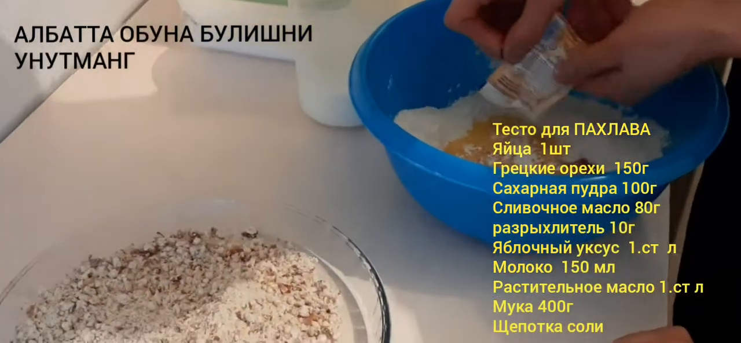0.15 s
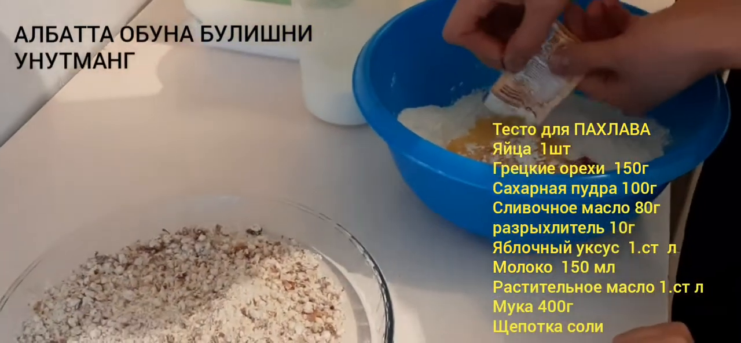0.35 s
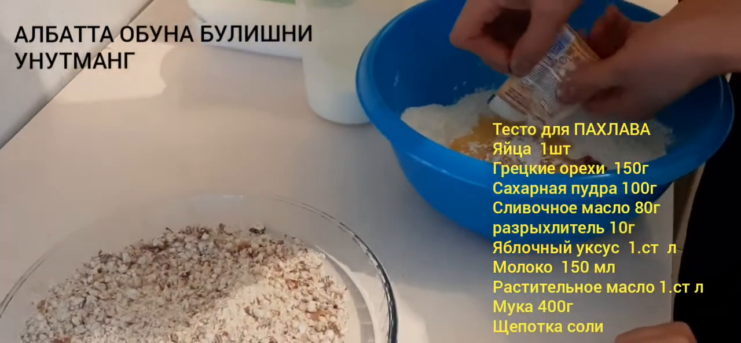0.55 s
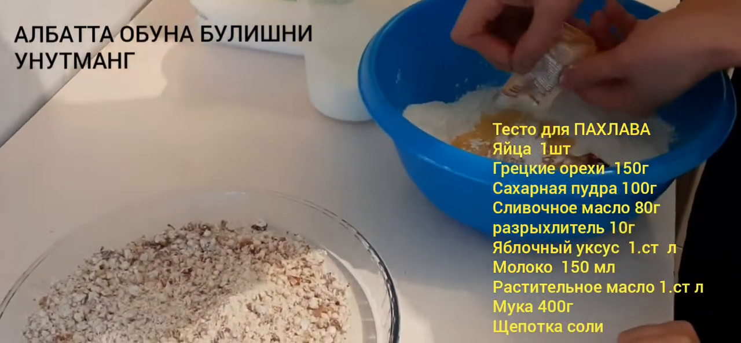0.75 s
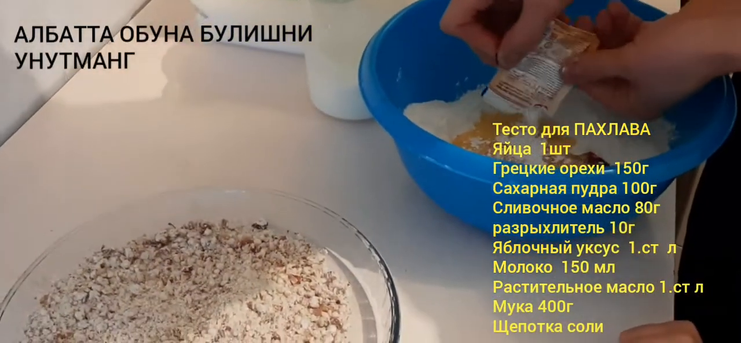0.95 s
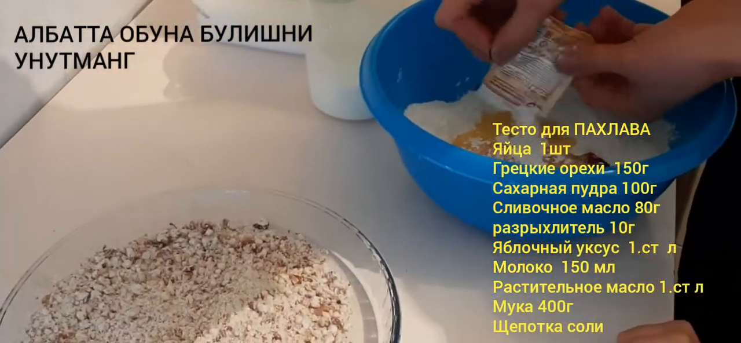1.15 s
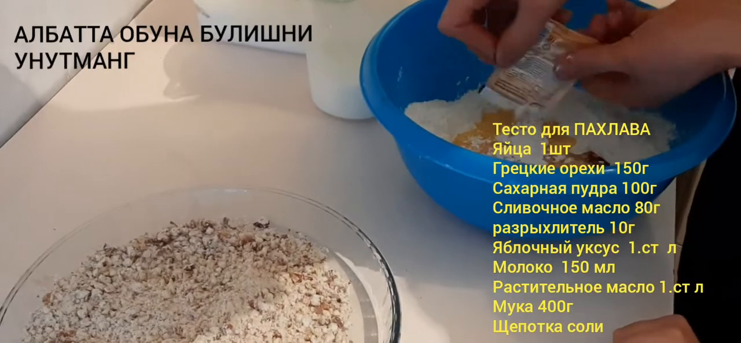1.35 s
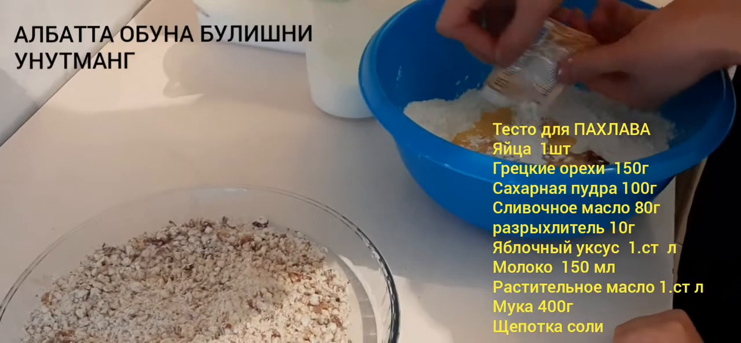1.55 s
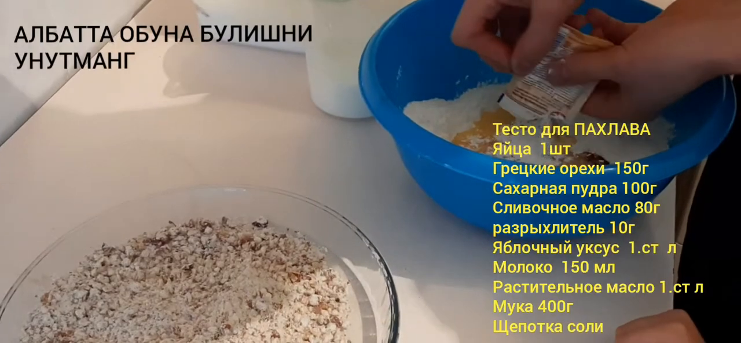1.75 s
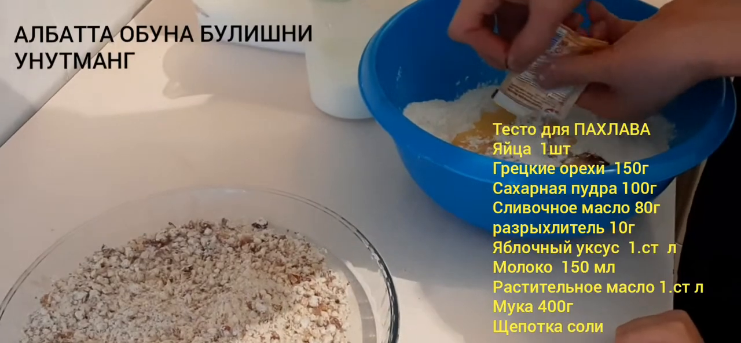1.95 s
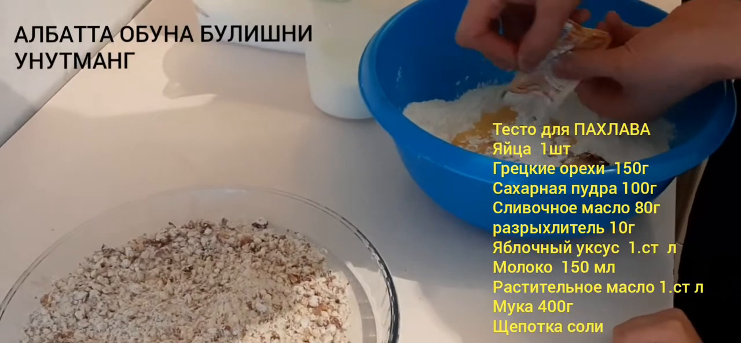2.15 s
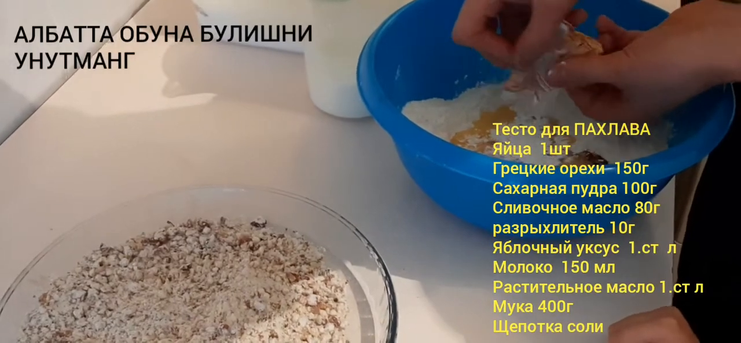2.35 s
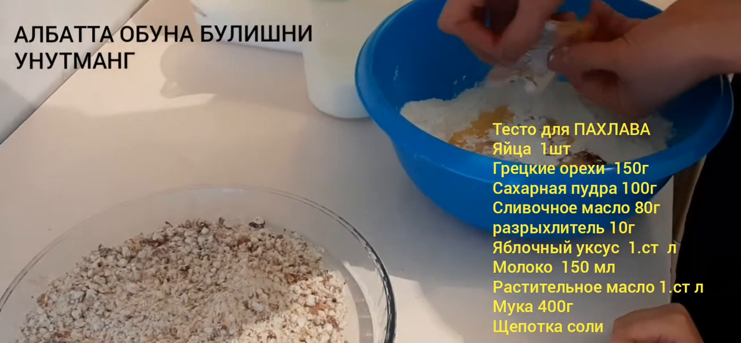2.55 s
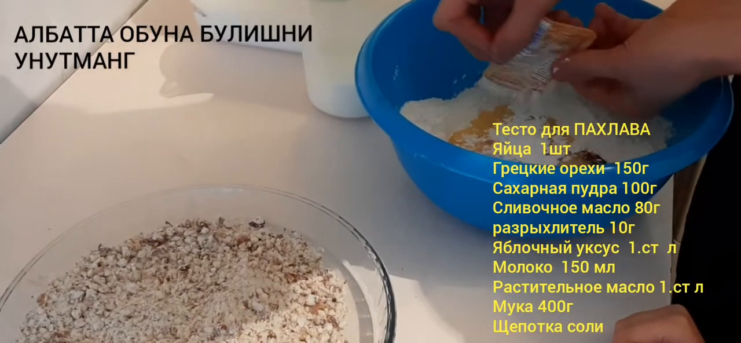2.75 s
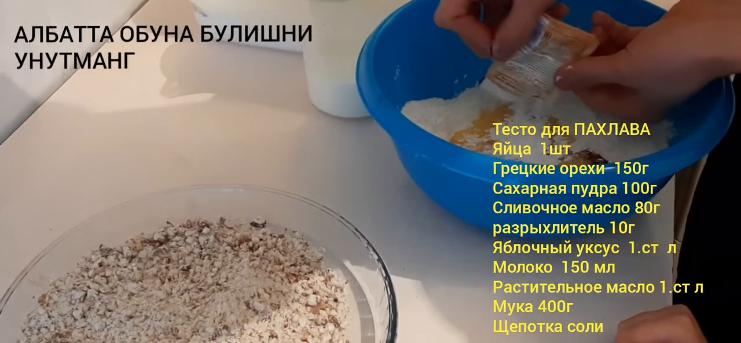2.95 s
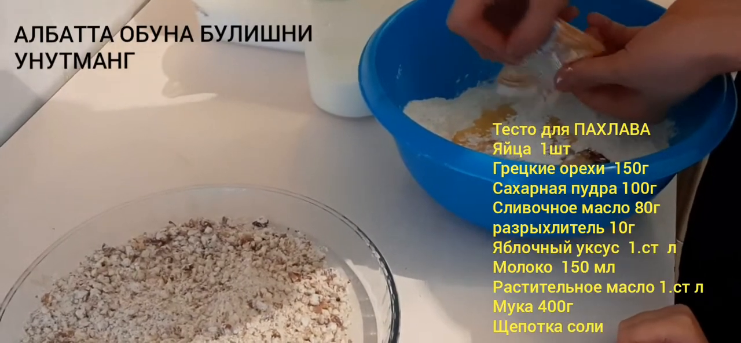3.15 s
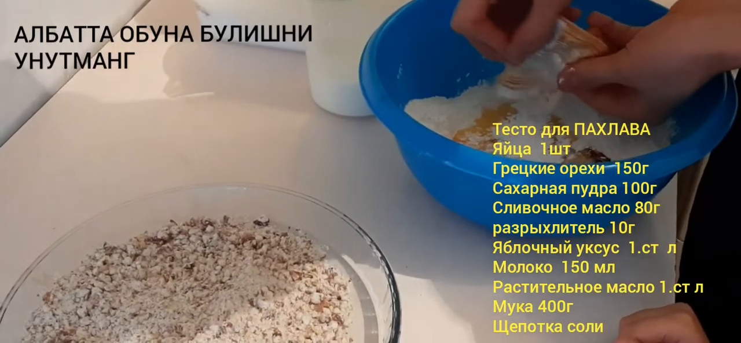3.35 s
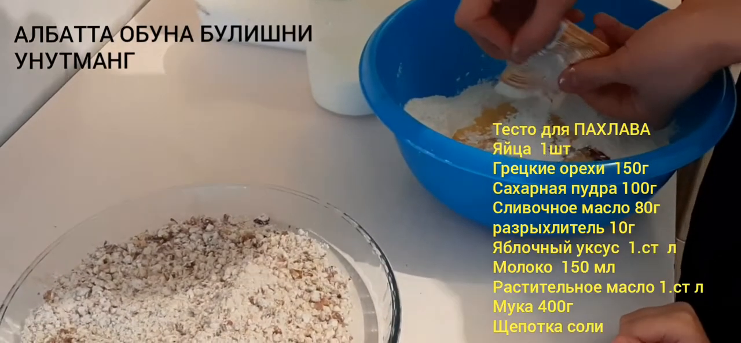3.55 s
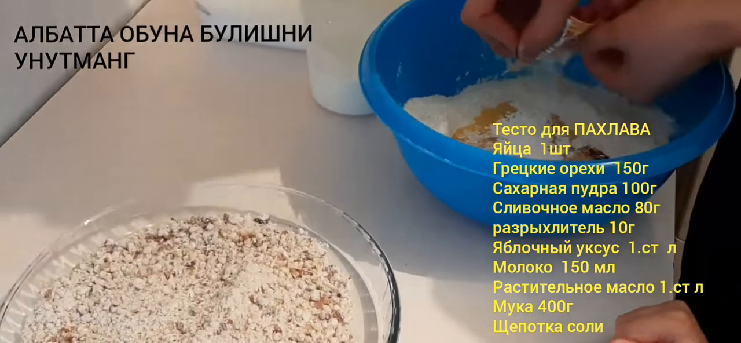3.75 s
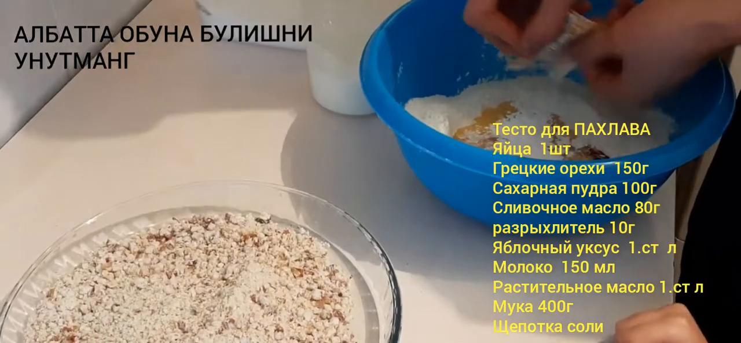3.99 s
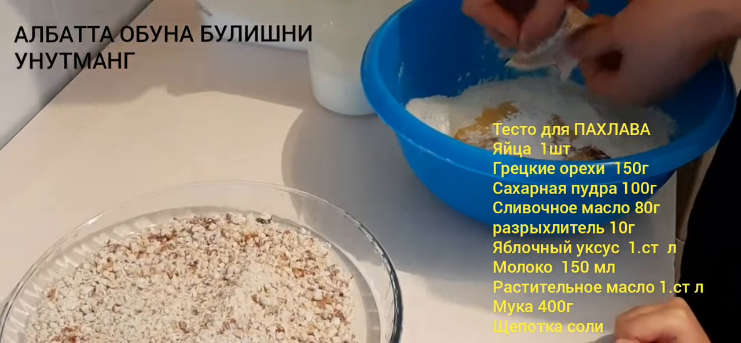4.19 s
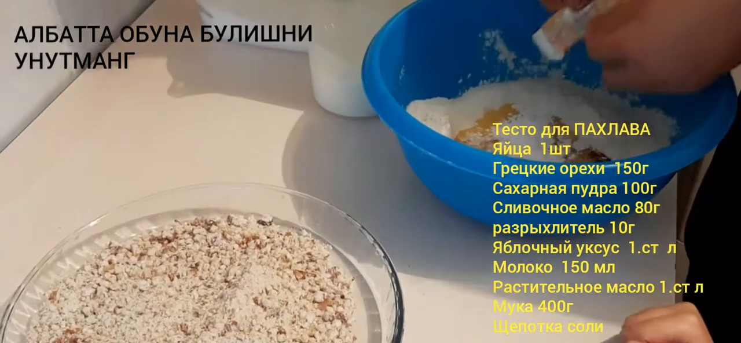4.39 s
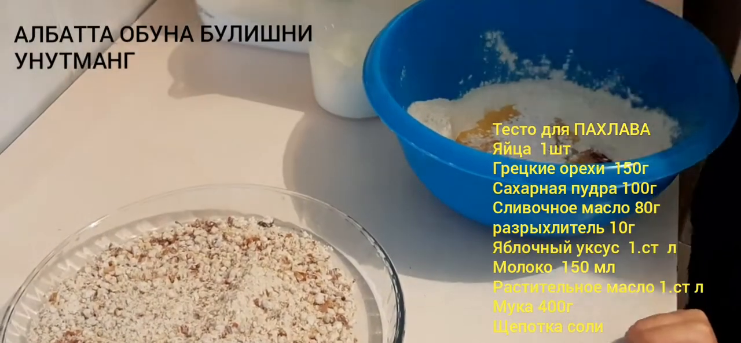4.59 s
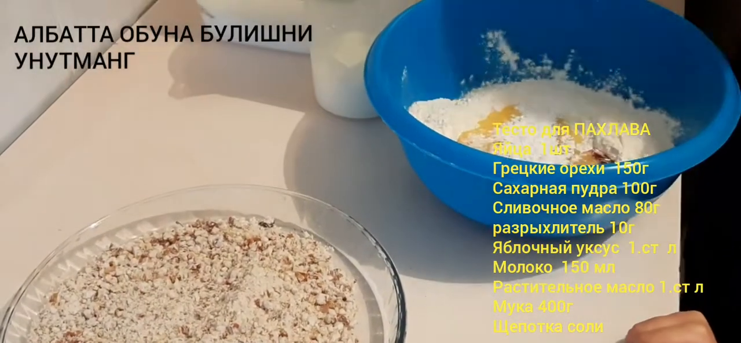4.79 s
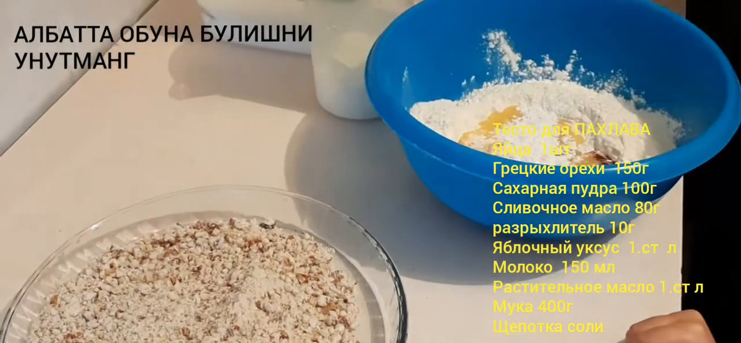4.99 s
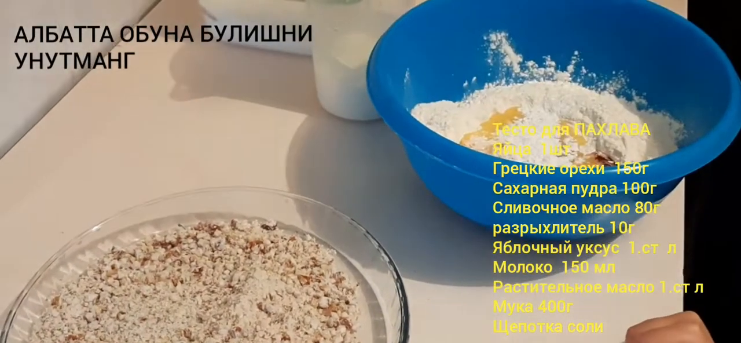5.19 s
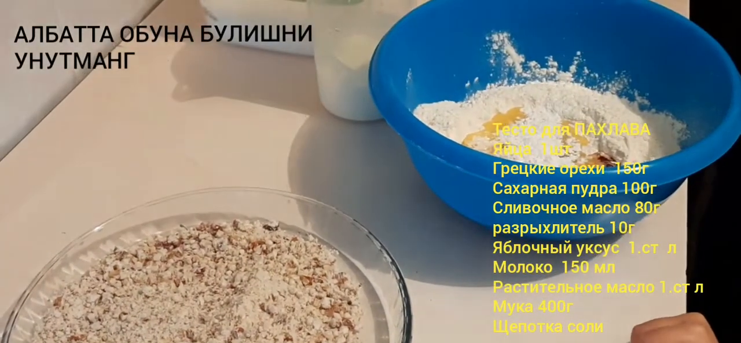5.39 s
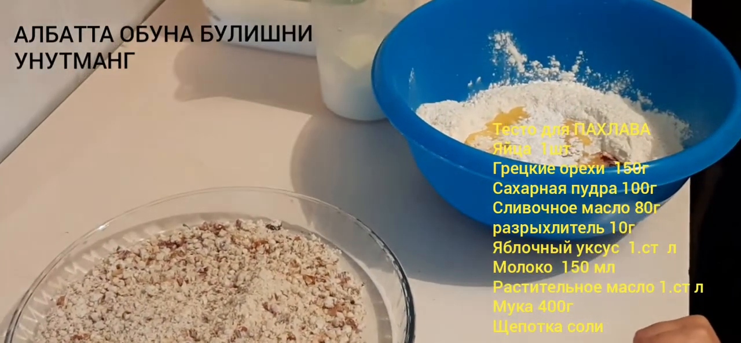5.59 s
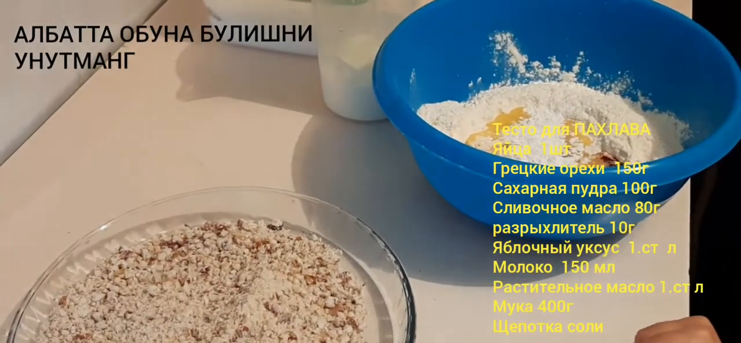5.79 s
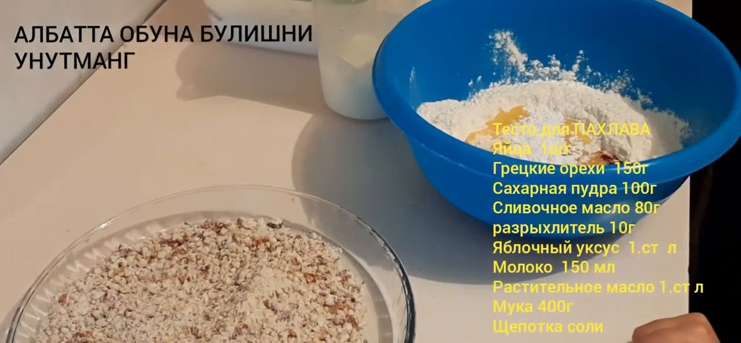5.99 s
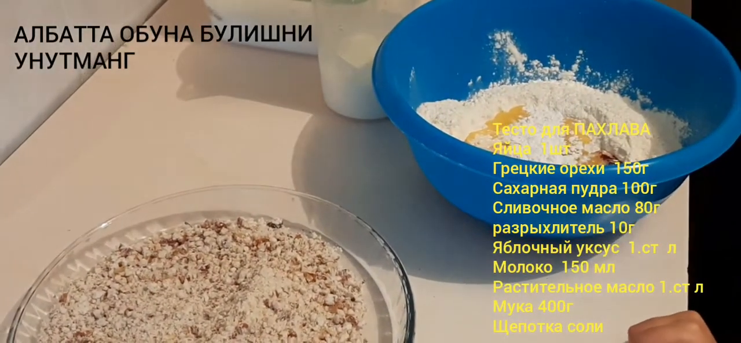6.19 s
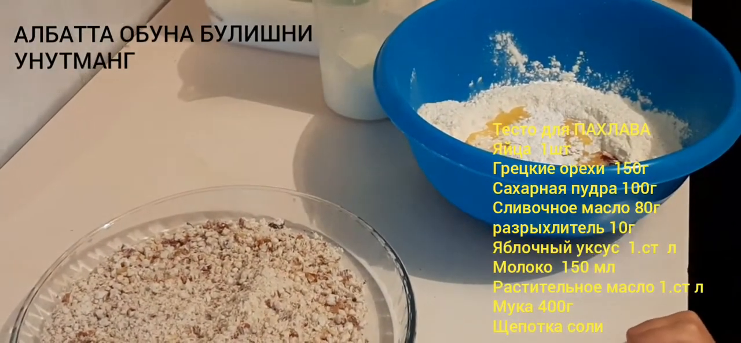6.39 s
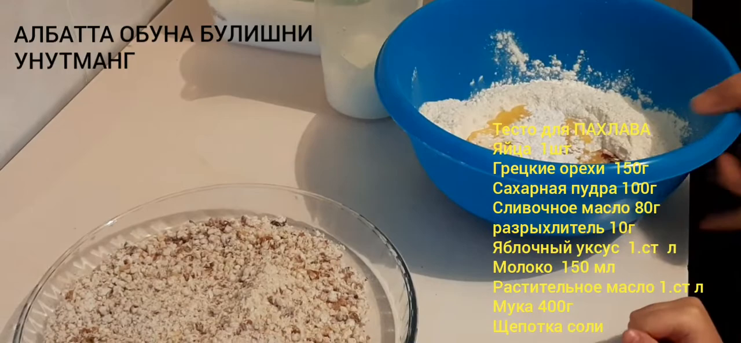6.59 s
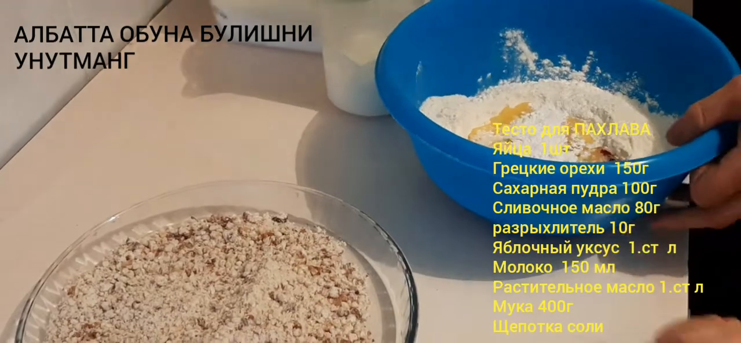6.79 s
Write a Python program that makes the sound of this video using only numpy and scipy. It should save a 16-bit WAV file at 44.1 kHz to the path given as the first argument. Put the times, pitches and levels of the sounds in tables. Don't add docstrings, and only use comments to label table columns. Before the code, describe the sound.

Very close stereo sound of a small paper sachet in a hard kitchen. Light separate snaps and rustles at first, then denser, louder crumpling with hollow pops, strongest in the middle. The crackle thins and moves left as the packet is put aside. A hard knock follows, then a brief scrape along the counter ending in two bumps. Faint hiss and distant low rumble lie underneath.

```python
import sys
import numpy as np
from scipy import signal
from scipy.fft import rfft, irfft
from scipy.io import wavfile
from scipy.ndimage import uniform_filter1d

SR = 44100
rng = np.random.default_rng(int(sys.argv[2]) if len(sys.argv) > 2 else 0)


def elevation(decibels):
    levels = np.asarray(decibels, float)
    return 10 ** (levels / 20)


def int16_out(signal):
    q = np.round(np.clip(np.atleast_2d(signal).T, -1, 1) * 32767)
    wavfile.write(sys.argv[1], SR, q.astype(np.int16))


N = 301515

# pitch_hz, level_db, t60_s
CUPBOARD_MODES = [(104, -0.5, 0.1), (187.3, 2, 0.14), (257, 0.5, 0.066)]


def in_time(rows):
    s, *columns = np.transpose(rows)
    return [np.interp(np.arange(N) / SR, s, c) for c in columns]


def at_hz(points, hz):
    point_hz, value = np.transpose(points)
    return np.interp(np.log(hz + 1), np.log(point_hz), value)


def rms_one(x):
    return x / np.sqrt(np.mean(x ** 2) + 1e-20)


def drift(rate):
    r = np.exp(-2 * np.pi * rate / SR)
    wander = signal.lfilter([1], [1, -2 * r, r * r], rng.standard_normal(N + SR))
    return rms_one(wander[SR:])


def resonance(x, hz, width_hz):
    r = np.exp(-np.pi * width_hz / SR)
    top = np.array([1, 0, -1]) * (1 - r * r) / 2
    return signal.lfilter(top, [1, -2 * r * np.cos(2 * np.pi * hz / SR), r * r], x + 1e-18)


def body(x, peaks):
    return sum((-1) ** k * elevation(db) * resonance(x, hz, width) for k, (hz, width, db) in enumerate(peaks))


def colour(x, spectrum):
    hz = np.minimum(np.arange(1025) * SR / 2048, 15000)
    cepstrum = irfft(np.log(elevation(at_hz(spectrum, hz))))
    cepstrum = cepstrum * np.r_[1, np.full(1023, 2), 1, np.zeros(1023)]
    return signal.oaconvolve(x, irfft(np.exp(rfft(cepstrum)))[None], axes=1)[:, :N]


def tint(hz, dull_db, bright_db):
    octaves = np.log2(hz / 3500)
    if hz <= 300:
        dull_db = np.minimum(dull_db, -3)
    dull = dull_db * np.clip(-octaves - .8, 0, 1)
    bright = bright_db * np.clip(2 * octaves - 1.6, 0, 1)
    return elevation(dull + bright)


def volleys(s, peak_db, slow):
    build_s = np.where(slow, .018, .004) * elevation(rng.standard_normal(len(s)))
    lead = rng.random((len(s), 12)) ** 1.5 * (np.arange(12) > 0)
    at = ((s[:, None] - .0008 - lead * build_s[:, None]) * SR).astype(int)
    volley = elevation(-10.0 * lead + 0.53 * rng.standard_normal(lead.shape))
    whole = elevation(peak_db + np.where(slow, 2, 6)) / np.linalg.norm(volley, axis=1)
    return np.clip(at, 0, N - 1), volley * whole[:, None], whole


def crackle(s, peak_db, slow):
    # under_peak_db, swell_db_per_s, dying_db_per_s, rounded_top_s
    snap_rustle = (-13.5, 5000, 800, .004)
    squeeze_rustle = (-5, 560, 600, 0.011)
    born = np.flatnonzero(rng.random(N) < 6000 * elevation(3 * drift(60)) / SR)
    shape = np.where(slow, np.array(squeeze_rustle)[:, None], np.array(snap_rustle)[:, None])
    under_db, swell, dying, top_s = shape[:, :, None]
    since = born / SR - s[:, None]
    slope = np.where(since < 0, swell, dying)
    around = elevation(peak_db[:, None] + under_db + slope * (top_s - np.hypot(since, top_s))) ** 2
    height_db = -4.5 + 1.5 * drift(60) + 2.6 * np.minimum(rng.exponential(1, N), 4)
    return born, elevation(height_db)[born], around


def cracks():
    # start_s, peak_db, pitch_hz
    stiff = [(0.443, -31, 5230), (.507, -26, 3050), (.556, -30.5, 980), (0.699, -44, 6000),
             (.832, -37, 9100), (.939, -33, 5000), (1.12, -31, 6000), (1.129, -31, 5600),
             (1.236, -35.5, 4040), (1.317, -37, 5000), (1.361, -49, 6000), (1.396, -31.5, 3180),
             (1.509, -22, 1094), (1.579, -31.5, 2480), (1.677, -26, 7700), (1.704, -33.5, 2500),
             (1.751, -29.5, 2300), (1.951, -26, 2870), (1.961, -17.5, 1090), (1.979, -30, 3000),
             (2.016, -29.5, 2180), (2.115, -20, 3240), (2.132, -43, 4160), (2.327, -31, 2820),
             (2.333, -20, 3160), (2.347, -18, 3130), (2.441, -25, 1400), (2.521, -20, 1370),
             (2.527, -23.5, 7350), (2.568, -25.5, 4160), (2.601, -19, 3070), (2.612, -30, 2480),
             (2.622, -22, 3470), (2.782, -40, 2220), (2.866, -21, 4470), (3.016, -38, 2130),
             (3.033, -20, 4450), (3.042, -18, 4440), (3.128, -24.5, 1280), (3.134, -21, 900),
             (3.201, -24, 3900), (3.271, -23, 2130), (3.339, -28, 2180), (3.454, -18, 6200),
             (3.55, -30.5, 1260), (3.733, -29, 3000), (3.741, -22.5, 5000), (4.496, -28.5, 2020),
             (4.257, -52, 2980), (5.058, -38, 7800), (5.341, -47, 5000), (5.352, -46, 5060),
             (6.665, -37, 2020), (5.116, -40.5, 11000)]
    # start_s, peak_db, pitch_hz
    pops = [(0.555, -44, 993), (1.506, -45, 999), (1.961, -21, 999), (2.013, -42, 633), (2.115, -51, 999),
            (2.293, -52, 665), (2.329, -48, 999), (2.359, -30, 589), (2.433, -39, 622), (2.597, -44, 974),
            (2.783, -38, 463), (2.818, -39, 974), (2.854, -25.5, 891), (2.949, -42, 977), (2.968, -35, 991),
            (3.014, -31, 947), (3.116, -37, 608), (3.266, -25, 606), (3.298, -35, 643), (3.39, -26, 606),
            (3.433, -41, 1000), (3.702, -46, 633), (3.737, -40, 549), (3.879, -32, 557), (3.994, -24, 484),
            (4.079, -23, 573)]
    # start_s, peak_db, pitch_hz
    further_cracks = [(.684, -35, 9000), (1.4305, -33, 9200), (1.909, -29, 2130), (1.930, -36.5, 10000),
                      (2.109, -31.5, 4200), (2.1541, -27, 3700), (2.588, -30, 3500), (2.608, -19.5, 3480),
                      (2.7144, -23.5, 3700), (2.7294, -28, 3700), (2.7564, -30, 3680), (2.8802, -21, 4610),
                      (3.471, -23.5, 3570), (3.675, -34, 1570), (3.76, -28, 2300), (3.7805, -30, 1930),
                      (3.899, -27, 4000), (3.915, -24, 3600), (3.925, -33, 2500), (4.034, -28.5, 2120),
                      (4.0746, -29, 3820), (4.088, -25.5, 3840), (4.1194, -32, 3500), (4.30, -44, 2980),
                      (4.34, -56, 3000)]
    return np.transpose(stiff + pops + further_cracks)


def paper():
    # start_s, peak_db, dull_db, bright_db
    shaking = [(.1515, -33.5, -10, -24), (.1814, -29, -17, -25), (.1946, -34.5, -3, 6.5),
               (.232, -34, -9, -3), (.3615, -27.5, -38, -11), (.4243, -29.5, -34, -14),
               (.4433, -24, -55, -13), (.5081, -38, -19, -55), (.5561, -38, 16, 13.5), (.6468, -32, -6, -1),
               (.6865, -44.5, -11, 23), (.833, -36, -29, 7), (.856, -22.5, -18.5, -29),
               (.8974, -30, -49, -3), (.9399, -39.5, -23, 10), (.962, -28.5, -6, 1), (1.0496, -27, -44, -9),
               (1.13, -27, -7.5, -5), (1.2183, -44, -9, 13), (1.2353, -23.5, -40, -38),
               (1.3175, -26, -36, -18), (1.3617, -29.5, -19, -10), (1.3953, -31, -27, -43),
               (1.5008, -31, -4, -1), (1.5095, -21.5, -1.5, -8), (1.644, -20.5, -22, -9),
               (1.7509, -31.5, -28, 4), (1.7869, -26.5, -19, -3), (1.8793, -27, -5.5, -36),
               (1.9391, -36, -12, 15.5)]
    # start_s, peak_db, dull_db, bright_db
    crumpling = [(2.1166, -16.5, -11.5, -13), (2.1312, -23.5, -48, -24), (2.219, -30, -24, -22),
                 (2.2913, -32, -3, -2.5), (2.3341, -20.5, -4.5, -45), (2.3486, -22.5, -40, -0.5),
                 (2.4087, -19.5, -15, -10.5), (2.4351, -18, -3.5, -13), (2.453, -30, 3, 9.5),
                 (2.5146, -14, -15, -10), (2.5694, -25.5, -24, 4.5), (2.6027, -18.5, -3, -14),
                 (2.703, -21, -26, -8), (2.7602, -24, -26, -4), (2.827, -18, -2.5, -5.5),
                 (2.8811, -40, -22, -8), (2.9524, -22, 0, -1), (2.9673, -15.5, -0.5, -3.5),
                 (3.125, -18, -0.5, 3.5), (3.1833, -25, 2, -22), (3.2641, -27, -12, 8),
                 (3.3226, -21.5, -1.5, -24), (3.3793, -27, -15, 2), (3.3918, -21.5, -4, -5.5),
                 (3.44, -18.5, -3.5, -10), (3.4562, -21, -49, -9), (3.47, -19, -59, -8),
                 (3.5503, -52, 3, -26)]
    # start_s, peak_db, dull_db, bright_db
    folding = [(3.6762, -34, -9, -3), (3.7006, -24.5, -4, -6), (3.7149, -19.5, -8, -3.5),
               (3.7812, -25, 5, 1), (3.8251, -26, -11, -11), (3.8766, -34.5, 14, 4),
               (3.916, -25, -32, -3.5), (3.9983, -21, 0, -1), (4.0344, -33, -1, -10),
               (4.2585, -34.5, -7.5, -54), (4.4215, -39, -14, -4), (4.435, -24.5, -32, -18),
               (4.4577, -27.5, -8.5, -10), (4.4945, -21, -20, -3), (4.62, -38.5, -8, -25),
               (4.655, -39, -2, -19), (4.979, -43, -13, -23), (5.337, -48, -34, -5),
               (6.2626, -36.5, 13.5, -8), (6.6634, -60, 0, -28), (6.797, -31, -14.5, -7.5)]
    # start_s, peak_db, dull_db, bright_db
    squeezes = [(0.01, -38, -3, 8.5), (0.692, -37.5, -14, 9), (0.764, -41, -9, -29),
                (0.8827, -43.5, -34, 5), (1.065, -56, -19, -14), (1.199, -42.5, -3.5, -4),
                (1.4305, -38.5, -8.5, -1), (1.6537, -38, -13, 8.5), (1.703, -40.5, -4, -21),
                (1.8032, -39.5, -31, -6), (1.9637, -32, 3.5, -17), (2.017, -37.5, 6, 5.5),
                (2.1567, -39.5, -5, -30), (2.523, -30, -18, -12), (2.608, -25, -13, 1.5),
                (2.669, -31, -35, -2), (2.7196, -32, -25, -4), (2.784, -27, -3.5, 4.5),
                (2.866, -28.5, -3, 5), (3.0166, -27, 3, -0.5), (3.044, -26.5, -45, 3),
                (3.1309, -46, 6, -19), (3.201, -30.5, -35, 7), (3.272, -38, 5.5, -16),
                (3.337, -30, -26, 2.5), (3.744, -23.5, -2, 2.5), (3.912, -28, -1, -1.5),
                (4.0903, -32, -14, 6), (5.06, -61, -6, 17), (5.139, -36, 0.5, 0.5)]
    # time_s, rustle_db, dull_db
    handling = [(0, -44, -12), (.12, -63, -5), (.2, -49, -8), (.34, -66, 2), (.4, -52.5, -32),
                (.66, -55.5, 8), (.82, -78, -12), (.9, -58, -3.5), (1.4, -50.5, -9), (2.0, -56.5, 2.5),
                (2.3, -52, -10), (2.55, -49, 5.5), (2.85, -44.5, -4), (3.45, -51, 5), (3.62, -59.5, -4),
                (4.13, -42, -2.5), (4.2, -59.5, 1), (4.4, -59.5, 4.5), (4.55, -56, -5)]
    # time_s, rustle_db, dull_db
    carrying = [
        (4.93, -70, -6),
        (5.0, -52, 2.5),
        (5.3, -58, -9),
        (5.52, -62.5, 3),
        (5.7, -50.5, -4),
        (6.3, -61, 15.5),
        (6.44, -64.5, -12),
        (6.65, -68.5, -28),
        (6.668, -53, -7),
    ]
    # after_s, level_db
    rattle = [(0, 1.5), (.0007, -3), (.0017, -5), (.0029, -7), (.0046, -9), (.0068, -12)]
    # pitch_hz, width_hz, level_db
    bowl_air = [(581, 110, -8), (1012, 280, -2), (1570, 97, 0.5), (2130, 117, -0.5), (4100, 520, -11.5)]
    # pitch_hz, level_db (per Hz)
    paper_colour = [(59, -43), (100, -23.5), (418, -16.5), (466, -7), (577, -5), (761, -8.5), (1000, -5),
                    (1300, -8.5), (2170, -4.5), (4200, -2.5), (7810, -4.5), (8690, -14), (11500, -4.5),
                    (15100, -6.5), (16500, -44)]

    snaps = shaking + crumpling + folding
    s, peak_db, dull_db, bright_db = np.transpose(snaps + squeezes)
    slow = np.arange(len(s)) >= len(snaps)
    at, strength, whole = volleys(s, peak_db, slow)
    lean_db = 1.06 * rng.standard_normal(len(s)) - 2.5
    sides = elevation(lean_db * np.array([[.5], [-.5]]))
    born, grains, around = crackle(s, peak_db, slow)
    grip_db, grip_dull_db = np.array(in_time(handling + carrying))[:, born]
    crack_s, crack_db, crack_hz = cracks()

    out = 0
    for hz in np.geomspace(130, 15000, 19):
        apart = np.clip(1.1 * hz / (hz + 500), 0, .97)
        both_ports = np.array([[np.sqrt(1 - apart ** 2), apart], [1, 0]])
        events = tint(hz, dull_db + 0.5, bright_db - 4.0) ** 2 @ around
        grip = elevation(grip_db) * tint(hz, grip_dull_db, -4.5)
        clicks = np.zeros((2, N))
        noise = both_ports @ rng.standard_normal((2, len(born)))
        clicks[:, born] = noise * grains * np.sqrt(events + grip ** 2)

        chance = rng.standard_normal((2, *strength.shape))
        volley_tint = tint(hz, dull_db + 5.0, bright_db + 8)
        for side, luck in enumerate(np.tensordot(both_ports, chance, axes=1)):
            level = whole / np.linalg.norm(strength * luck, axis=1)
            gain = level * sides[side] * volley_tint
            np.add.at(clicks[side], at, strength * luck * gain[:, None])

        crack = elevation(crack_db + 11 - 21 * np.abs(np.log2(hz / crack_hz)))
        for after_s, loss_db in rattle:
            sign = rng.choice([-1, 1], (2, len(crack)))
            clicks[:, ((crack_s + after_s) * SR).astype(int)] += elevation(loss_db) * crack * sign
        out = out + resonance(clicks, hz, .42 * hz)

    ringing = 0
    for hz, width_hz, db in bowl_air:
        shading = elevation(db + 3.5 * drift(5))
        ringing = ringing + resonance(shading * out, hz, width_hz)
    return colour(out + ringing, paper_colour) * elevation(13.5)


def bumps():
    # start_s, peak_db, pitch_hz of the struck spot
    knocks = [(5.113, -20.5, 1170), (5.116, -25, 740), (5.129, -31, 1170), (5.14, -27, 726),
              (5.158, -25, 1170), (5.16, -39.5, 452), (5.175, -37, 1170), (5.199, -31, 1170),
              (5.219, -39, 716), (5.23, -47, 452), (5.762, -41.5, 452), (6.069, -38, 452),
              (6.092, -35.5, 624), (6.121, -44, 624), (6.152, -30, 716), (6.261, -23, 985),
              (6.263, -27, 452), (6.265, -28, 1450), (6.275, -24.5, 716), (6.29, -36, 985),
              (6.31, -39, 716), (6.34, -47, 985), (6.791, -55, 1170)]
    # pitch_hz, level_db, t60_s
    counter_modes = [(452, -3, .05), (624, -4, .05), (716, -3, .05), (985, -3, .05), (1170, -1.5, .06),
                     (1450, -5, .05)]
    # start_s, peak_db, pitch_hz
    pushes = [(2.5, -62, 190), (3.11, -51, 111), (5.612, -53.5, 106), (5.748, -51, 100), (5.99, -51, 200),
              (6.088, -45, 200), (6.109, -45, 104), (6.1475, -32.5, 220), (6.157, -31.5, 104),
              (6.215, -46, 104), (6.262, -45, 180), (6.31, -43, 119), (6.38, -56, 201), (6.68, -58, 106),
              (6.8, -53.5, 121)]
    out = np.zeros(N)
    # trim_db, fall_db per octave off the struck pitch, fade_db per second of scuffing
    for rows, modes, trim_db, fall_db, fade_db in ((knocks, counter_modes, -4.0, 28, 1200),
                                                   (pushes, CUPBOARD_MODES, 3.0, 12, 6000)):
        s, level_db, spot_hz = np.transpose(rows)
        scuff = np.cumsum(rng.exponential(.003, (len(s), 4)), axis=1)
        scuff = scuff - scuff[:, :1]
        at = ((s[:, None] + scuff) * SR).astype(int)
        for hz, db, t60 in modes:
            clicks = np.zeros(N)
            height = elevation(level_db + trim_db + db - fall_db * np.abs(np.log2(hz / spot_hz)))
            clicks[at] = height[:, None] * rng.uniform(0.26, 1, scuff.shape) * elevation(-fade_db * scuff)
            soft = signal.butter(4, 1.36 * hz, fs=SR, output="sos")
            clicks = signal.sosfilt(soft, clicks + 1e-18)
            r, w = elevation(-60 / (t60 * SR)), 2 * np.pi * hz / SR
            push = [np.sin(w) / 2, 0, -np.sin(w) / 2]
            out += signal.lfilter(push, [1, -2 * r * np.cos(w), r * r], clicks + 1e-18) / w
    return out


def slide():
    # time_s, friction_db, shudder_db
    course = [
        (5.5, -78, -97),
        (5.648, -55, -62),
        (5.784, -55, -63),
        (5.95, -60, -59),
        (6.08, -72, -62),
        (6.21, -71, -39.5),
        (6.266, -58, -50),
        (6.396, -75, -61),
        (6.45, -91, -89),
    ]
    # pitch_hz, width_hz, level_db
    object_body = [(935, 32, 0), (720, 100, -19), (480, 120, -19), (1500, 300, -22)]
    friction_db, shudder_db = in_time(course)
    moving = np.interp(np.arange(N) / SR, [5.45, 5.55, 6.4, 6.48], [0, 1, 1, 0])
    rough = rng.standard_normal((2, N)) * elevation(2.5 * drift(60))
    shake = body(rough[1], [(hz, 30, db) for hz, db, t60 in CUPBOARD_MODES])
    rub = body(rough[0], object_body)
    rub = rub / uniform_filter1d(rub ** 2, size=600) ** (.7 / 2)
    return moving * (elevation(friction_db + 2.5) * rms_one(rub) + elevation(shudder_db - 6.0) * rms_one(shake))


def kitchen(x, early_db, early_s, late_db, alike_hz, count=6):
    # pitch_hz, t60_s
    room_t60 = [(300, 0.48), (1500, 0.35), (5000, 0.29), (15000, 0.21)]
    t, hz = np.arange(16384) / SR, np.arange(8193) * SR / 16384
    white = rfft(rng.standard_normal((count, 3, len(t))))
    alike = 1 / (1 + (hz / alike_hz) ** 2)
    white = np.sqrt(alike) * white[:, 2:] + np.sqrt(1 - alike) * white[:, :2]
    tail = 0
    edges = np.geomspace(60, 20000, 10)
    for low, high in zip(edges, edges[1:]):
        band = irfft(white * ((hz >= low) & (hz < high)))
        tail = tail + band * elevation(-60 * t / at_hz(room_t60, np.sqrt(low * high)))
    late = elevation(late_db) * tail * np.clip(t / 0.016, 0, 1)
    early = elevation(early_db) * irfft(white) * np.exp(-t / early_s) * (t > .0005)
    nearness = np.array([elevation(9 * drift(20)) for place in range(count)])
    share = nearness / np.sqrt(np.sum(nearness ** 2, axis=0))
    return signal.fftconvolve((share * x)[:, None], early + late, axes=2).sum(axis=0)[:, :N]


def background():
    # time_s, level_db
    traffic = [(0.0, -71), (0.19, -66), (1.18, -64), (1.31, -71), (2.34, -76.5), (2.51, -58), (2.8, -73),
               (2.86, -69), (4.7, -80), (4.85, -75.5), (5.0, -80), (5.54, -83.5), (5.66, -76), (6.0, -80),
               (6.17, -88), (6.28, -59), (6.51, -103), (6.68, -64), (6.84, -78)]
    # pitch_hz, width_hz, level_db
    room_modes = [(60, 10.6, -5.5), (31.3, 13, -20.5), (82, 7.6, -10.5), (136.4, 6.4, -11.5)]
    # time_s, pitch_hz, level_db
    engine = [
        (0.0, 58.8, -79),
        (0.208, 55.6, -58.5),
        (0.512, 60.0, -63),
        (0.68, 60.3, -62),
        (0.71, 59, -78),
        (0.94, 60.0, -63.5),
        (1.19, 56.6, -67),
        (1.494, 57.4, -87),
        (1.5, 55.7, -82),
    ]
    # pitch_hz, level_db (per Hz)
    hiss_colour = [(35, -30), (60, -34.5), (145, -6), (220, -10), (327, -11.5), (385, -15), (423, -11.5),
                   (509, -17.5), (2010, -6), (2840, -25), (8900, -13.5), (11500, -11), (15500, -11)]
    # pitch_hz, width_hz, level_db
    whistle = (7700, 750, 5.8)
    mid, side = body(rng.standard_normal((2, N)), room_modes)
    rumble = elevation(in_time(traffic)[0]) * rms_one(mid + elevation(-9.0) * side * np.array([[1], [-1]]))
    pitch, drone_db = in_time(engine + [(1.8, engine[-1][1], -100)])
    drone = elevation(drone_db) * np.sqrt(2) * np.sin(2 * np.pi * np.cumsum(pitch) / SR)
    white = rng.standard_normal((3, N))
    lows = signal.butter(1, 600, fs=SR, output="sos")
    common = signal.sosfilt(lows, 1.4 * white[2] - white[:2])
    hz, width_hz, db = whistle
    airy = white[:2] + common + elevation(db + 2 * drift(20)) * resonance(white[:2], hz, width_hz)
    return rumble + drone + elevation(-65 + 2.5) * rms_one(colour(airy, hiss_colour))


def scene():
    left_lag, right_lag = 4, 10
    sachet, counter = paper(), bumps() + slide()
    no_bass = signal.butter(4, 85, "high", fs=SR, output="sos")
    counter = signal.sosfilt(no_bass, counter)
    left, right = sachet * elevation([[-3.5], [-.4]])
    near = np.arange(N) < 4.56 * SR
    carried_off = [elevation(-1.0) * left, np.roll(right, right_lag)]
    direct = np.where(near, [np.roll(left, left_lag), right], carried_off)
    knocks = np.array([elevation(1.0) * counter, np.roll(counter, right_lag)])
    echoes = kitchen(sachet[1] + elevation(-3.0) * counter, early_db=-23, early_s=.004, late_db=-33.0, alike_hz=580)
    return direct + knocks + echoes * elevation([[1.5], [-1.5]]) + background()


def band_limit(x):
    return signal.sosfilt(signal.butter(12, 16970, fs=SR, output="sos"), x)


def record(dry):
    # pitch_hz, width_hz, depth (0-1)
    port_notch = (8840, 167, 0.5)
    treble = signal.sosfilt(signal.butter(2, 7400, "high", fs=SR, output="sos"), dry[0])
    ports = np.array([elevation(-1) * dry[0] + 0.43 * treble, dry[1]])
    notch_hz, width_hz, depth = port_notch
    ports = ports - depth * resonance(ports, notch_hz, width_hz)
    top_cut = signal.ellip(8, .5, 44, 15850, fs=SR, output="sos")
    return band_limit(signal.sosfilt(top_cut, ports))


dry = scene()
out = record(dry)
int16_out(out)
```